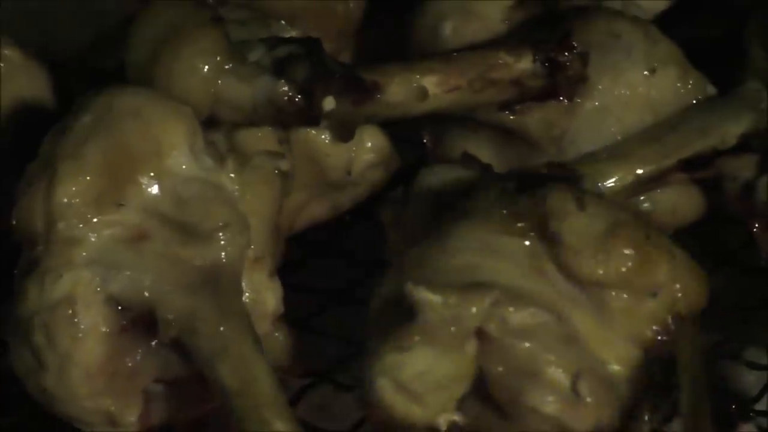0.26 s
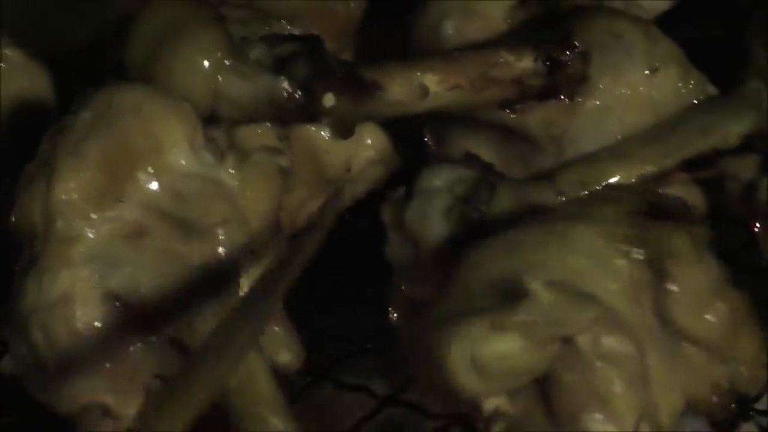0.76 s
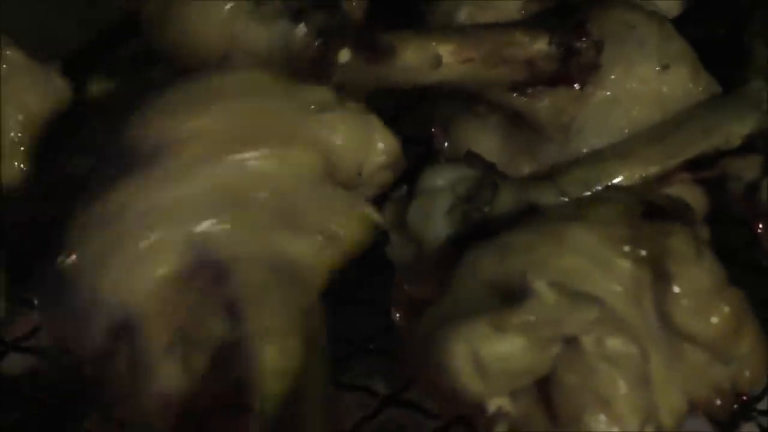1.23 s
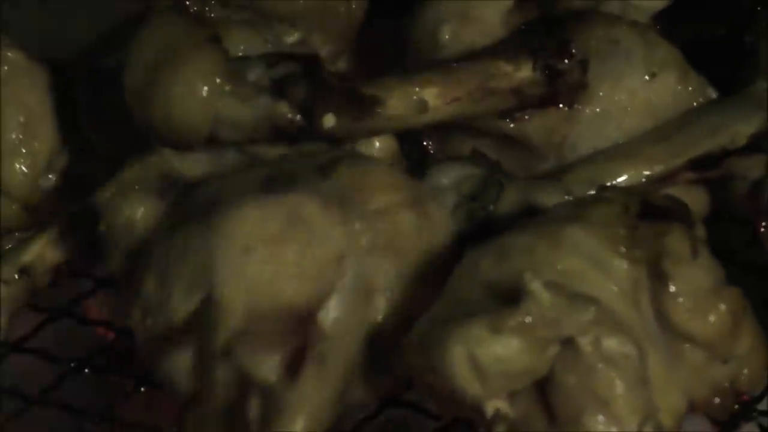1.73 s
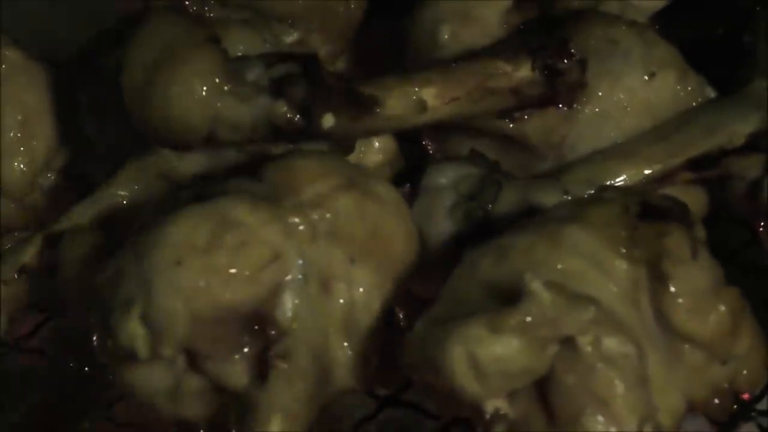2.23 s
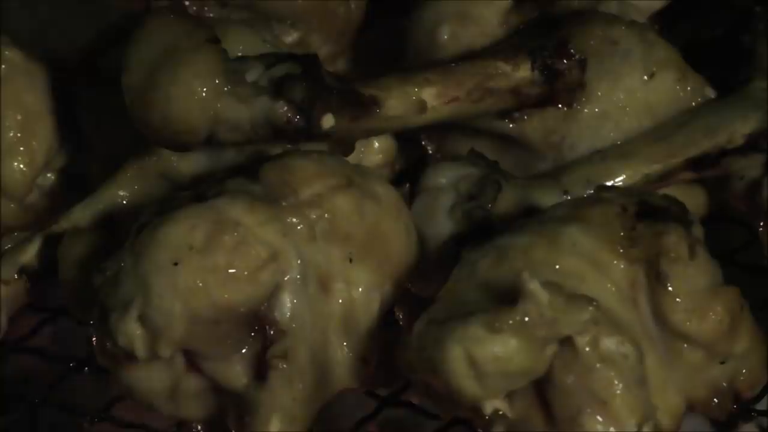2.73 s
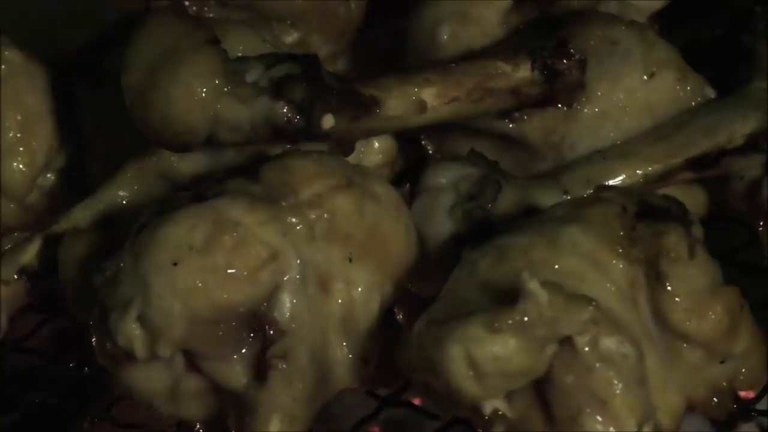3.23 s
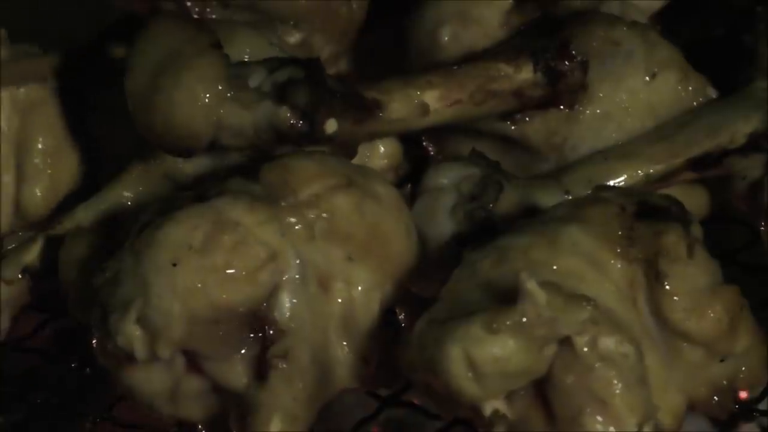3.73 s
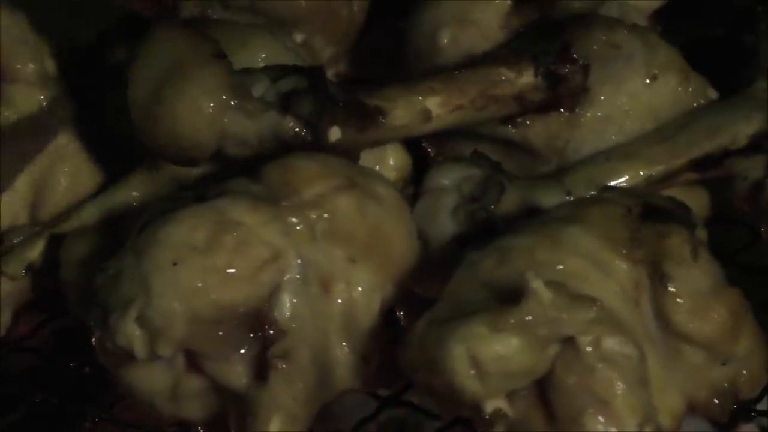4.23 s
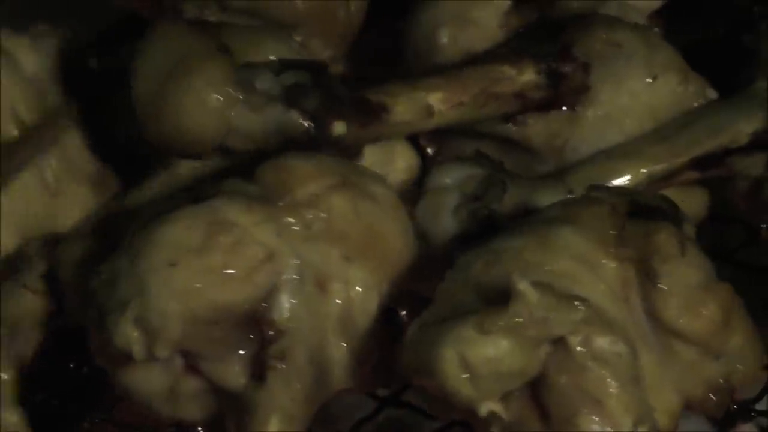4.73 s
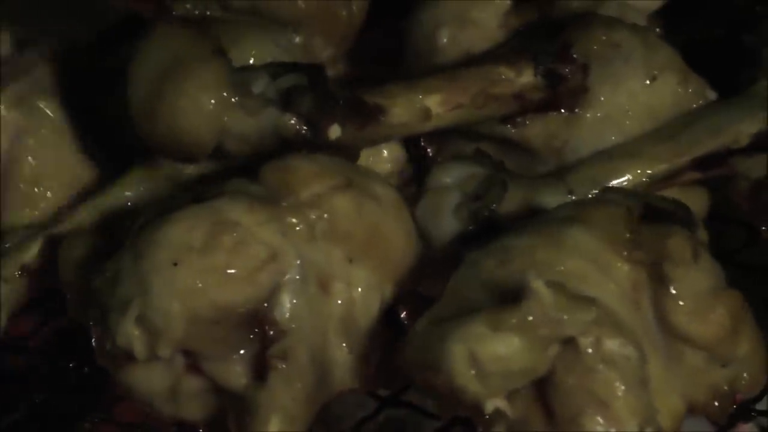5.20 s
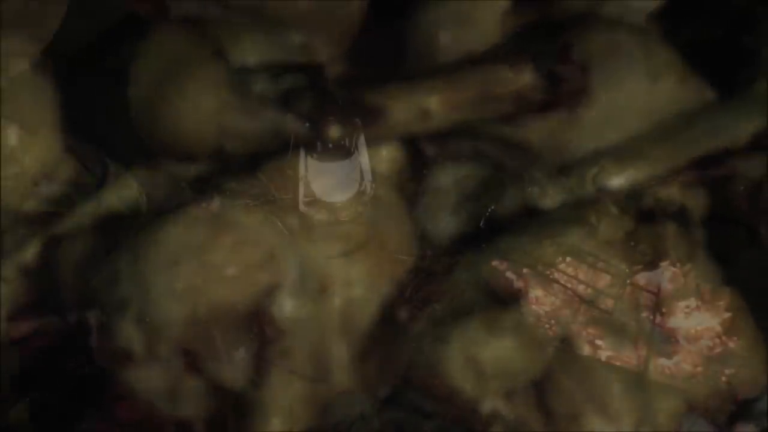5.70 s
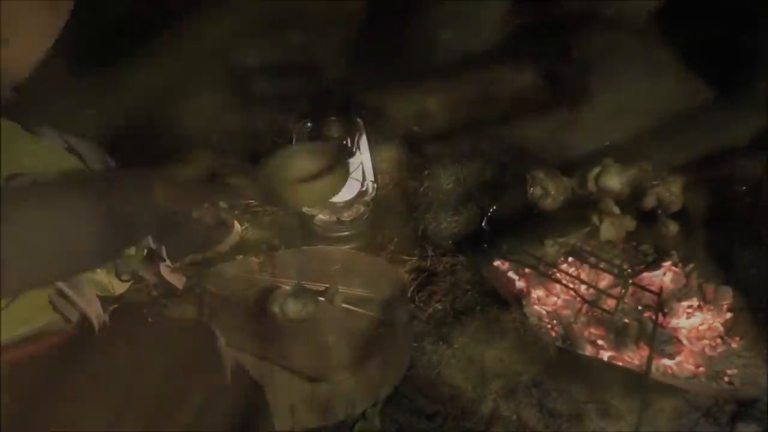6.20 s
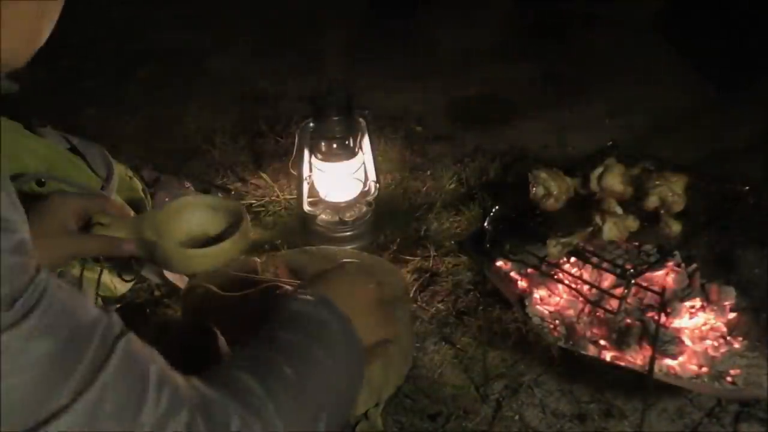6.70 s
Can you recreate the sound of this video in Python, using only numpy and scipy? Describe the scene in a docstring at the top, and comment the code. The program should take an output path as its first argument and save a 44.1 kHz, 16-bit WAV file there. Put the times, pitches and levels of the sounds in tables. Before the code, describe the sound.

From 0 s the microphone hangs just over meat frying on charcoal: a thin, bright, hollow sizzle over a faint low murmur and soft water-like swells. Around 0.4-1.1 s dripping fat flares, with dense sputter, sharp ticks and quick pops, while the wash swells near 0.7 s. It settles to a light simmer with scattered snaps; a modest flare comes at 2.2 s. Quiet frying continues until a hard pop at 3.8 s briefly ducks the whole sound. A bright hissing flare bursts at 4.6 s, ticks follow, and the loudest pop cracks at 5.25 s. At 5.5 s everything switches abruptly to open air: low wind puffs, a wider, louder wash leaning left, drier sizzle slightly right. Pops snap at 5.8 s; a tiny steam whistle slides downward at 6.1 s. The wash swells strongest around 6.4 s as crackling goes on to the end.

```python
"""A night camp: chicken sizzles on a charcoal grill, as steam bubbles modelled by coloured random clicks. Fat
drips flare on the coals, ticking and popping as short noise bursts; the loudest pops duck the recorder's gain.
At first the microphone hangs just over the meat, where a short echo hollows the sound; behind it filtered
noise, something like water on a shore, swells. Then the scene changes to the open, the grill further off, in
light wind and a louder wash, and a jet of steam, a gliding sine, whistles briefly. Source levels precede mixing
trims, echo and gain control."""
import sys
import numpy as np
from scipy import signal
from scipy.fft import rfft, irfft, next_fast_len
from scipy.io import wavfile
from scipy.ndimage import uniform_filter1d

SR = 44100
rng = np.random.default_rng(int(sys.argv[2]) if len(sys.argv) > 2 else 0)


def to_wav(s):
    """Save 16-bit WAV."""
    ch = np.atleast_2d(s).T  # columns
    pcm = np.round(np.clip(ch, -1, 1) * 32767)  # PCM
    wavfile.write(sys.argv[1], SR, pcm.astype(np.int16))


N = 306476
TIME = np.arange(N) / SR
FFT_SIZE = next_fast_len(N + 1000, True)  # room for echoes to die out
SCENE_CHANGE_S = 5.486  # the scene changes here: the microphone is close before this, in the open after
METER_SAMPLES = 176  # averaging window, about 4 ms


def amp(db):
    """Decibel law: level in dB to amplitude gain."""
    return 10 ** (np.asarray(db) / 20)


def unit(x):
    """Normalization: scales a signal to rms 1."""
    return x / np.sqrt(np.mean(x ** 2) + 1e-20)


def level(rows, axis=1):
    """Envelope: gain at every sample, interpolated in dB from one column of a curve."""
    rows = np.array(rows)
    return amp(np.interp(TIME, rows[:, 0], rows[:, axis]))


def read(points, hz):
    """Spectral interpolation: joins points by lines on a log-frequency axis."""
    f, value = np.transpose(points)
    return np.interp(np.log(hz + 1), np.log(f), value)


def add(mix, s, sound):
    """Superposition: sums a sound into the mix at a time in seconds."""
    part = mix[max(round(s * SR), 0):][:len(sound)]
    part += sound[:len(part)]


def colour(x, points, size=1024):
    """Minimum-phase filtering: a causal response of energy 1 keeps the front of a click sharp."""
    hz = abs(np.fft.fftfreq(size, 1 / SR))
    log_gain = np.log(amp(read(points, hz)))
    minimum_phase = np.exp(np.conj(signal.hilbert(log_gain)))
    taps = np.fft.ifft(minimum_phase).real[:size // 2]
    return signal.fftconvolve(x, taps / np.linalg.norm(taps))[:len(x)]


def air(points, likeness):
    """Partial coherence: sum and difference noises set the left-right correlation in each band."""
    hz = np.fft.rfftfreq(FFT_SIZE, 1 / SR)
    mid, side = rfft(rng.standard_normal((2, FFT_SIZE)))
    same = np.clip(read(likeness, hz), 0, .9995)
    mid = mid * np.sqrt(1 + same)
    side = side * np.sqrt(1 - same)
    stereo = np.array([mid + side, mid - side])
    return unit(irfft(stereo * amp(read(points, hz)), FFT_SIZE)[:, :N])


def flutter(depth_db, size):
    """Random amplitude modulation: a wandering gain of given rms depth, smoothed twice over size samples."""
    smooth = uniform_filter1d(rng.standard_normal(N), size)
    return amp(depth_db * unit(uniform_filter1d(smooth, size)))


def bubbles(per_s, spread_db, largest):
    """Shot noise: random clicks of either sign, most of them small and a few large."""
    sizes = amp(spread_db * np.minimum(rng.exponential(1, N), largest))
    present = rng.random(N) < per_s / SR
    return unit(sizes * rng.choice([-1, 1], N) * present)


def drift(x, depth_db):
    """Time-varying filtering: random gains wander slowly over time and frequency."""
    z = signal.stft(x, nperseg=512)[2]
    patches = rng.standard_normal(z.shape[::-1]).T
    for _ in range(2):
        patches = uniform_filter1d(patches, size=8, axis=0)
        patches = uniform_filter1d(patches, size=24, axis=1)
    return signal.istft(z * amp(depth_db * unit(patches)), nperseg=512)[1][:N]


def meter(x):
    """Short-time rms: root mean square in a window centred on each sample."""
    return np.sqrt(abs(uniform_filter1d(x ** 2, METER_SAMPLES)) + 1e-14)


# level of a faint far-off hum: (time [s], level [dB])
HUM_LEVELS = [(0, -79.5), (1.4, -72.5), (2.3, -75.5), (2.6, -83.5), (5.48, -78)]
HUM_HZ, HUM_WIDTH_HZ = 736.4, 52  # centre, and bandwidth of each of two resonators


def hum():
    """Resonance: noise through two narrow resonators in series becomes a wavering tone."""
    b, a = signal.iirpeak(HUM_HZ, HUM_HZ / HUM_WIDTH_HZ, fs=SR)
    once = signal.lfilter(b, a, rng.standard_normal(N))
    return level(HUM_LEVELS) * unit(signal.lfilter(b, a, once))


# spectrum of the low background murmur: (frequency [Hz], relative level [dB])
MURMUR_SPECTRUM = [(20, -35), (45, -13), (100, 0), (170, 4), (250, 0.5), (340, -9), (440, -7), (560, -15.5),
                   (660, -17.5), (745, -17), (840, -20.5), (1200, -17), (3000, -26), (16000, -71)]
# correlation of left and right near the grill, murmur and wash: (frequency [Hz], correlation [0 to 1])
LIKENESS_CLOSE = [(30, 0.96), (150, 0.98), (700, 0.98), (1300, 0.99), (2400, 1), (4400, .999)]
MURMUR_DB = -61


def murmur():
    """Diffuse background: low-weighted noise, nearly alike at both ears, with a slow flutter."""
    return amp(MURMUR_DB) * air(MURMUR_SPECTRUM, LIKENESS_CLOSE) * flutter(depth_db=1.36, size=4000)


# swells of the distant wash: (crest time [s], rise [s], fall [s], crest level [dB])
SWELLS = [(.13, 0.12, 0.27, -63.5), (.48, 0.2, 0.14, -56.5), (.69, 0.2, 0.18, -51),
          (1.87, 0.13, 0.33, -56.5), (2.93, 0.091, 0.11, -59), (3.37, 0.1, 0.16, -54.5),
          (3.73, 0.12, 0.36, -59), (4.06, 0.28, 0.2, -59.5), (4.76, 0.093, 0.072, -55),
          (5.55, 0.27, 0.48, -53.5), (5.88, 0.14, 0.065, -54.5), (6.43, 0.25, 0.46, -44)]
CALM_DB, CALM_OPEN_DB = -69, -55  # the wash between swells, over the grill and in the open


def swells():
    """Energy addition: swells rise and drain over a calm level, each at one microphone position only."""
    close = TIME < SCENE_CHANGE_S
    power = amp(np.where(close, CALM_DB, CALM_OPEN_DB)) ** 2
    for crest, rise, fall, db in SWELLS:
        age = TIME - crest
        shape = np.exp(-abs(age / np.where(age < 0, rise, fall)) ** 1.5)
        same_position = close == (crest < SCENE_CHANGE_S)
        power = power + (amp(db) * shape) ** 2 * same_position
    return np.sqrt(power)


# spectrum of the wash over the grill: (frequency [Hz], relative level [dB])
WASH_SPECTRUM = [(100, -11.5), (400, -9), (600, -11.5), (850, -19.5), (1020, -3.5), (1380, -0.5),
                 (1800, -5), (2600, -7), (4000, -11.5), (8000, -25), (16000, -33)]


def wash_close(swell):
    """Amplitude modulation: the swells shape fluttering broadband noise."""
    noise = air(WASH_SPECTRUM, LIKENESS_CLOSE)
    return amp(-0.4) * swell * noise * flutter(depth_db=1.43, size=900)


# spectrum of the wash in the open: (frequency [Hz], relative level [dB])
WASH_OPEN_SPECTRUM = [(100, -14), (350, -1.5), (580, -10.5), (700, -6), (850, -10), (1030, -0.5),
                      (1380, -0.5), (2000, -5), (3000, -9.5), (4500, -16.5), (8000, -24.5), (16000, -30)]
# correlation of left and right in the open, wash and wind: (frequency [Hz], correlation [0 to 1])
LIKENESS_OPEN = [(30, 1), (200, 0.78), (400, 0.97), (900, 0.98), (2400, 0.9), (4400, 0.53), (9000, 1)]


def wash_open(swell):
    """Level difference: swelling noise leans left by being stronger in that channel."""
    lean_left = amp([[.7], [-.7]])
    return amp(1.28) * swell * air(WASH_OPEN_SPECTRUM, LIKENESS_OPEN) * lean_left


# gusts on the microphone: (peak time [s], level [dB])
GUSTS = [(5.505, -43), (5.69, -50), (5.82, -45), (5.95, -48), (6.15, -48), (6.33, -45.5), (6.46, -48.5),
         (6.70, -45)]
GUST_S, BREEZE_DB = 0.042, -52.5  # standard deviation of a gust, and the wind between gusts


def gusts():
    """Energy addition: short Gaussian puffs over a light breeze give the wind's gain."""
    power = amp(BREEZE_DB) ** 2
    for s, db in GUSTS:
        puff = np.exp(-((TIME - s) / GUST_S) ** 2 / 2)
        power = power + (amp(db) * puff) ** 2
    return np.sqrt(power)


# spectrum of the wind: (frequency [Hz], relative level [dB])
WIND_SPECTRUM = [(20, -17), (45, -3), (85, 0.5), (130, -4), (200, -12.5), (320, -13.5), (550, -25),
                 (1500, -47.5), (16000, -98)]


def wind():
    """Wind noise: low-frequency random pressure, modulated by gusts and flutter."""
    return gusts() * air(WIND_SPECTRUM, LIKENESS_OPEN) * flutter(depth_db=1.0, size=1200)


# a jet of steam: (time [s], pitch [Hz], peak amplitude [dB])
WHISTLE = [(6.095, 9300, -62), (6.105, 8900, -50), (6.125, 8100, -47), (6.15, 7750, -56),
           (6.175, 7600, -53), (6.195, 7450, -64)]


def whistle():
    """Jet tone: steam squeals through a slit in the skin, falling in pitch as the pressure drops."""
    s, hz, _ = np.transpose(WHISTLE)
    pitch = np.interp(TIME, s, hz) * flutter(depth_db=.04, size=80)
    tone = np.sin(2 * np.pi * np.cumsum(pitch) / SR)
    sounding = (TIME > s[0]) & (TIME < s[-1])
    return tone * level(WHISTLE, axis=2) * sounding


# resonant patches in the frying and in the wash behind it:
# (start [s], length [s], pitch [Hz], width of each resonator [Hz], level [dB])
RESONANT_PATCHES = [(.04, 0.62, 1406, 250, -64.5), (0.101, .42, 1940, 800, -59),
                    (.55, 0.29, 3200, 880, -46), (0.558, .22, 7400, 1000, -49.5),
                    (2.83, 0.246, 1300, 555.6, -61.5), (4.612, 0.67, 6300, 1400, -52.5),
                    (4.624, .5, 7700, 1400, -61), (4.631, 0.58, 3500, 750, -57.5)]
PATCH_FADE_DB = 3.5  # loss of level from start to end of a patch


def resonant_patches():
    """Resonance: dense random clicks ring two resonators in series and fade."""
    out = np.zeros(N)
    for start, length, hz, width, db in RESONANT_PATCHES:
        count = int(length * SR)
        b, a = signal.iirpeak(hz, hz / width, fs=SR)
        clicks = bubbles(per_s=5000, spread_db=4, largest=4)[:count]
        ring = signal.lfilter(b, a, signal.lfilter(b, a, clicks))
        fade = amp(db + PATCH_FADE_DB * np.linspace(.5, -.5, count))
        add(out, start, fade * unit(ring) * signal.windows.tukey(count, .25))
    return out


# the loudest single bubbles snapping: (time [s], peak level [dB])
TICKS = [(0.2416, -29), (0.4468, -25), (.6884, -26), (0.723, -19), (0.731, -25), (0.8899, -24),
         (1.009, -22), (1.241, -31), (2.0686, -30), (2.2864, -26), (2.436, -21), (2.4728, -24.5),
         (2.5545, -25.5), (3.0838, -24), (3.7986, -17), (3.8134, -20), (4.1824, -24), (4.4708, -24),
         (4.479, -26), (4.7041, -18), (4.91, -18), (5.035, -19.5), (5.1084, -23), (5.8035, -19.5),
         (6.0716, -27), (6.4732, -23), (6.493, -24), (6.8272, -24), (6.8498, -25)]
# spectrum of a snap, in ticks and pops: (frequency [Hz], relative level [dB])
SNAP_SPECTRUM = [(300, -45), (1000, -40.5), (2500, -11.5), (5000, -5.5), (7500, 0.5), (11000, 3),
                 (16000, -3.5)]
STRAY_PER_S, STRAY_DB, STRAY_SPREAD_DB = 16, 15.5, 3.5  # lesser snaps: rate, mean peak over fizz gain, spread
TICK_DELAY_S = 0.00066  # added to every tick time


def ticks(fizz):
    """Impulse and scattering: a snap a bubble, scattered briefly by meat and grate; lesser ones at random."""
    out, t = np.zeros(N), np.arange(600) / SR
    chance, size = rng.random(N), rng.standard_normal(N)
    stray = []
    for i in np.flatnonzero(chance < STRAY_PER_S / SR):
        stray_db = 20 * np.log10(fizz[i]) + STRAY_DB + STRAY_SPREAD_DB * size[i]
        stray.append((TIME[i], stray_db))
    for s, db in TICKS + stray:
        drive = 0.29 * rng.standard_normal(len(t)) * np.exp(-t / 0.00097)
        drive[0] = 1  # the snap itself, ahead of its scattered tail
        snap = colour(drive, SNAP_SPECTRUM)
        add(out, s + TICK_DELAY_S, amp(db) * snap / abs(snap).max())
    return out


# big bursts of fat: (time [s], peak short-time rms [dB], burst length [s],
# low crack, before an 8 dB cut [dB], treble setting [dB], spray against burst [dB])
POPS = [(0.375, -27, 0.0015, 2.5, -9, -10), (.6762, -26, .0011, 5, 0, -23),
        (0.772, -37, 0.00078, 13, -1, -26), (1.033, -32.5, .004, -6, -6, -15),
        (2.231, -37, 0.0062, -8.5, -2, -30), (2.653, -38, 0.0037, -20, -5, -20),
        (3.788, -20, 0.0019, -6, -9, -11), (4.642, -31, 0.0048, -27, 5, -7),
        (4.996, -32, 0.0037, 4, -2, -26), (5.018, -28, 0.0012, -10, 0, -30),
        (5.2506, -16.5, 0.0011, -22, 1, -13.5), (5.7882, -32, 0.0013, -2.5, -7, -3),
        (6.1507, -33.5, 0.00062, -3, -8, -17), (6.394, -35.5, 0.0017, -3, -2, -11),
        (6.551, -32.5, 0.0036, -5, 9, -15), (6.7157, -29, 0.0017, 1.5, 6.5, -8.5)]
# spectrum of the low crack: (frequency [Hz], relative level [dB])
CRACK_SPECTRUM = [(400, -41), (1000, -15.5), (1900, 0), (3300, 2), (5000, 1.5), (9000, -22.5), (16000, -35)]


def pops():
    """Transient release: a blister tears open in milliseconds and throws a dying spray of droplets."""
    out, t = np.zeros(N), np.arange(4096) / SR
    for s, db, length, crack_db, treble_db, spray_db in POPS:
        tear, mist, clumps = rng.standard_normal((3, len(t)))
        burst = np.sign(tear) * np.exp(-(t / length) ** 2)
        dying = np.exp(-t / .004) + 0.31 * np.exp(-t / 0.026)
        spray = mist * amp(2.4 * clumps - 2.5) * dying
        drive = burst + amp(spray_db) * spray
        pop = colour(drive, SNAP_SPECTRUM) + amp(crack_db - 8) * colour(drive, CRACK_SPECTRUM)
        pop = colour(pop, [(9000, -1.5), (13000, treble_db), (15000, treble_db), (17000, -6)])
        add(out, s, amp(db) * pop / meter(np.pad(pop, METER_SAMPLES)).max())
    return out


# steady frying under the flares: (time [s], fizz level [dB])
SIMMER = [(0, -57), (.3, -52), (1.3, -52.5), (1.75, -53.5), (2.6, -54), (3.0, -51.5), (3.7, -52.5),
          (4.55, -53.5), (5.48, -47), (5.49, -52.5), (6.1, -51.5), (6.5, -48), (6.95, -52)]
# fat dripping on the coals: (start [s], hold [s], decay [s], fine fizz [dB], coarse sputter [dB])
DRIPS = [(0.363, .02, 0.24, -48, -50.5), (0.557, 0.12, .1, -44, -50.5), (.68, 0.065, 0.15, -41.5, -46.5),
         (0.885, 0.17, 0.047, -48.5, -52.5), (2.223, 0.17, 0.27, -51.5, -57),
         (3.298, 0.059, 0.1, -58, -56.5), (4.637, 0.022, 0.11, -38.5, -52.5),
         (4.647, 0.43, 0.28, -43.5, -68), (5.777, 0.038, .035, -42, -52.5)]
SIMMER_SPUTTER_DB, FAR_SPUTTER_DB = -12, -7.5  # simmering sputter against fizz, close up and further off
FLARE_S = 0.0097  # a drip flashes to steam this fast


def frying():
    """Flash boiling: each drip flares at once, holds and dies away, adding energy to the steady simmer."""
    fizz = level(SIMMER) ** 2
    ratio_db = np.where(TIME < SCENE_CHANGE_S, SIMMER_SPUTTER_DB, FAR_SPUTTER_DB)
    sputter = fizz * amp(ratio_db) ** 2
    for start, hold, decay, fizz_db, sputter_db in DRIPS:
        age = TIME - start
        flare = np.clip(age / FLARE_S, 0, 1) * np.exp(-np.maximum(age - hold, 0) / decay)
        fizz = fizz + (amp(fizz_db) * flare) ** 2
        sputter = sputter + (amp(sputter_db) * flare) ** 2
    return np.sqrt(fizz), np.sqrt(sputter)


# spectrum of the fine fizz: (frequency [Hz], relative level [dB])
FIZZ_SPECTRUM = [(1000, -46), (3500, -27.5), (5500, -13), (7000, -4.5), (9000, -1.5), (10800, 1),
                 (13000, -2.5), (16000, -5.5)]
# spectrum of the coarse sputter: (frequency [Hz], relative level [dB])
SPUTTER_SPECTRUM = [(600, -36), (1500, -12.5), (2500, -2.5), (3400, 0.5), (4200, -3), (5000, -2),
                    (6500, -2), (9000, -11), (16000, -27.5)]


def sizzle(fizz, sputter):
    """Bubble noise: steam hiss and bursting bubbles; the harder the fat fries, the more it crackles."""
    crackle = bubbles(per_s=450, spread_db=6.0, largest=2.4)
    crackle = crackle * amp(-5.5) * (fizz / amp(-48)) ** 0.23
    fine = bubbles(per_s=9000, spread_db=2.5, largest=2.6) + crackle
    coarse = bubbles(per_s=7000, spread_db=3.5, largest=4.8) + amp(0.5) * crackle
    hiss = amp(-1.86) * fizz * colour(fine, FIZZ_SPECTRUM)
    spatter = amp(-1.0) * sputter * colour(coarse, SPUTTER_SPECTRUM)
    return drift(hiss + spatter, depth_db=1.0) * flutter(depth_db=.9, size=400)


GAP_S, GAP_ECHO = .00287, .38  # round trip between microphone and grill, and its strength at low frequencies


def hollow(x):
    """Comb filtering: sound bounces between microphone and grill; the treble scatters sooner."""
    hz = np.fft.rfftfreq(FFT_SIZE, 1 / SR)
    bounce = GAP_ECHO / np.hypot(1, hz / 4500) * np.exp(-2j * np.pi * hz * GAP_S)
    return irfft(rfft(x, FFT_SIZE) / (1 - bounce), FFT_SIZE)[:, :N]


# sound thrown back by the ground: (frequency [Hz], relative level [dB])
SCATTER_SPECTRUM = [(500, 2), (2000, 4), (4400, 10), (8000, -3), (12000, -20), (16000, 1)]


def ground(x, db):
    """Diffuse reflection: short scattered echoes enter left and right in opposite sign."""
    t = np.arange(1500) / SR
    taps = colour(rng.standard_normal(len(t)) * np.exp(-t / 0.0043), SCATTER_SPECTRUM)
    side = amp(db) * signal.oaconvolve(x, taps / np.linalg.norm(taps))[:N]
    return np.array([x + side, x - side])


CEILING_DB, RECOVER_DB_PER_S, LOOK_AHEAD_S = -26, 3, 0.014


def gain_control(x):
    """Peak limiting: a level above the ceiling turns everything down, and the gain creeps back."""
    t = TIME[:x.shape[1]]
    over_db = np.maximum(20 * np.log10(meter(x.mean(0))) - CEILING_DB, 0)
    recovered_db = RECOVER_DB_PER_S * t
    held_db = np.maximum.accumulate(over_db + recovered_db) - recovered_db
    early_db = np.interp(t + LOOK_AHEAD_S, t, held_db)
    return x * amp(-uniform_filter1d(early_db, METER_SAMPLES))


RIGHT_DB = .8  # in the open the central sound is raised this much on the right and cut as much on the left


def scene():
    """Superposition: central, hollow sound close up; wider and shifted right in the open."""
    swell = swells()
    background = hum() + murmur() + wash_close(swell)
    open_air = wind() + wash_open(swell)
    fizz, sputter = frying()
    central = whistle() + resonant_patches() + ticks(fizz) + pops() + sizzle(fizz, sputter)
    near = hollow(central + background)
    shift_right = amp([[-RIGHT_DB], [RIGHT_DB]])
    far = ground(central, db=-22) * shift_right + open_air
    back = np.clip((TIME - SCENE_CHANGE_S) / 0.0012, 0, 1)
    return (1 - back) * near + back * far


EDGE_HZ = 15950


def record(dry):
    """Band limiting: a low-pass follows gain control, which starts afresh at the second position."""
    parts = np.split(dry, [round(SCENE_CHANGE_S * SR)], axis=1)
    ducked = np.hstack([gain_control(part) for part in parts])
    low_pass = signal.firwin(401, EDGE_HZ, window=("kaiser", 8), fs=SR)
    return signal.oaconvolve(ducked, low_pass[None], "same")


dry = scene()
out = record(dry)
to_wav(out)
```